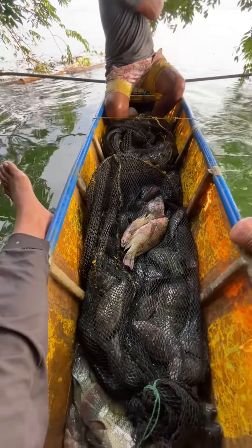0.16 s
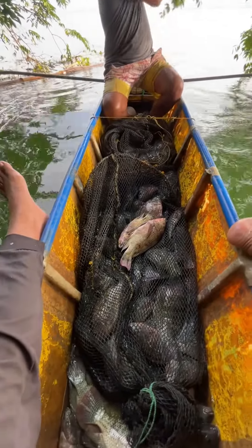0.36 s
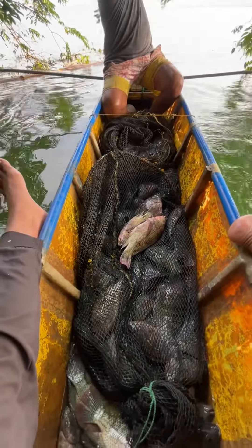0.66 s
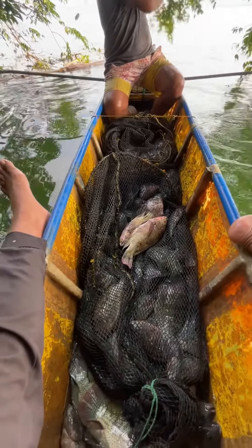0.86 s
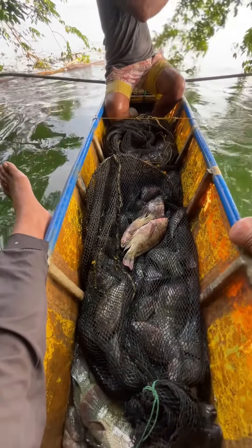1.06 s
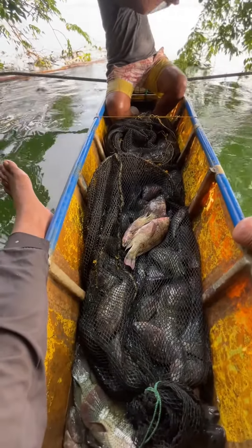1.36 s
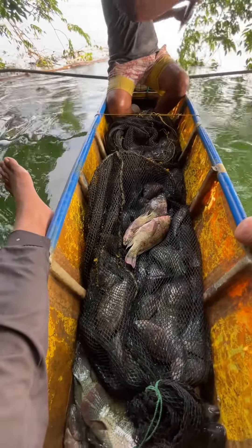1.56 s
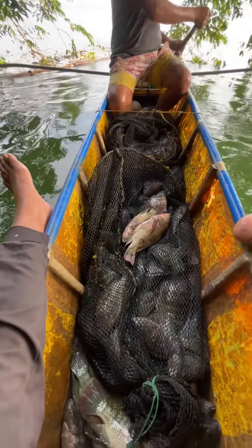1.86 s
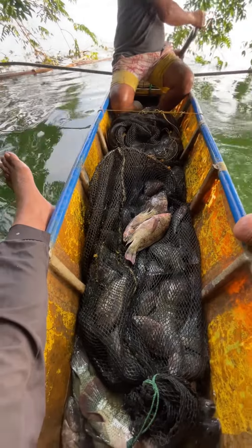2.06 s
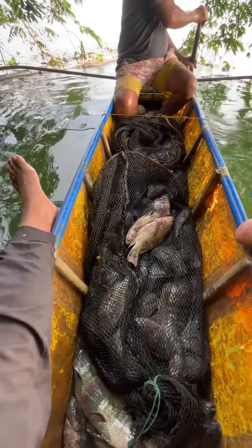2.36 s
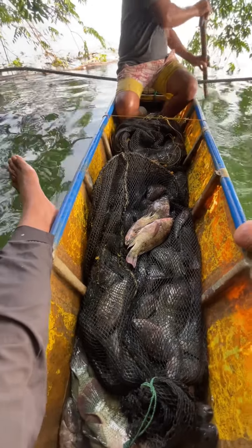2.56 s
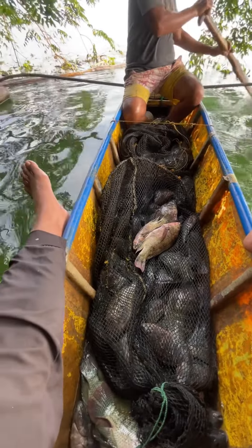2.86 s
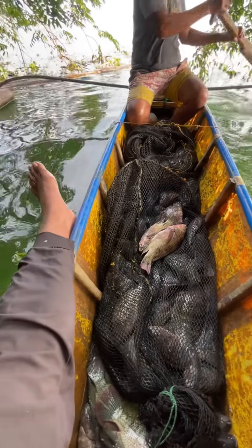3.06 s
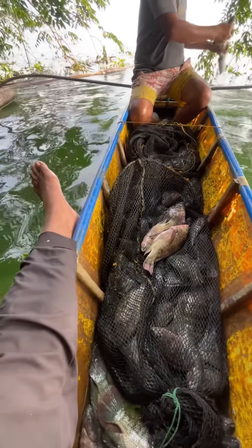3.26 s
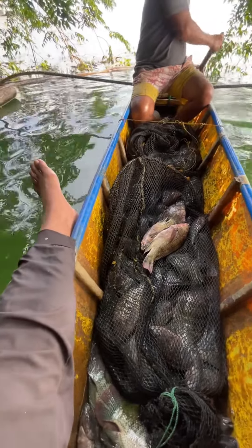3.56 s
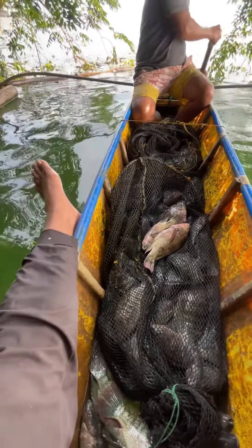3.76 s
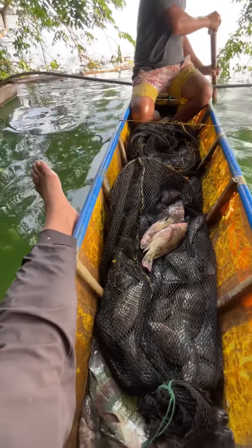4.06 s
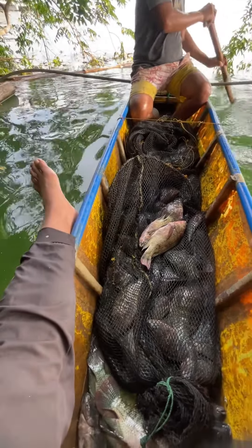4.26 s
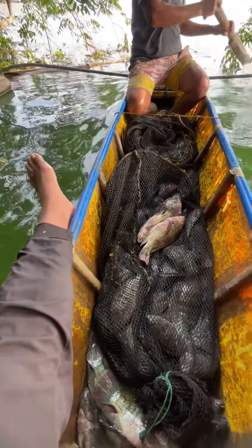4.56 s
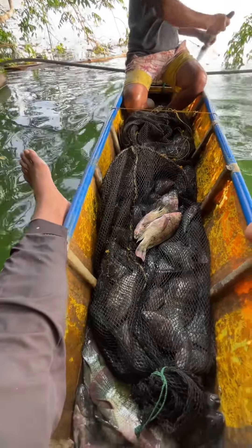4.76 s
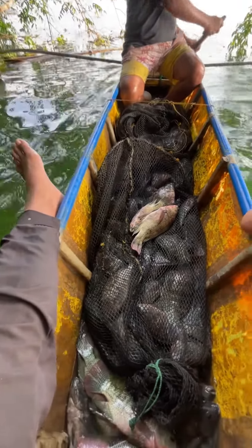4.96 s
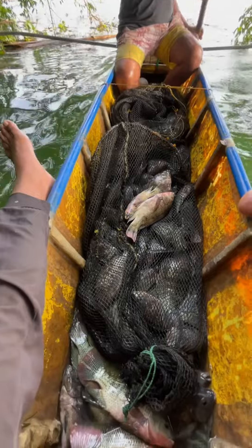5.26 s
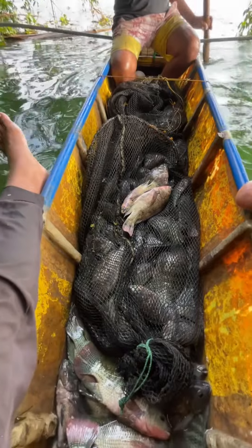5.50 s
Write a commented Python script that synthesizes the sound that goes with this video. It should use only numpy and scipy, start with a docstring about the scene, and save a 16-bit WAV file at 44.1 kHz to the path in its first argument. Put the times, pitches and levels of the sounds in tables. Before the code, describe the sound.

A distant boat engine hums steadily on a wooded river while small birds twitter and chirp. Heard close up from a wooden canoe, paddle strokes wash along the side with hollow plops and trickles. A short splash and dull knocks on the hull come first, then more gurgling. Later a nearer bird sings two whistled trills, and a loud wooden thump follows just before the end.

```python
"""Canoe on a wooded river

A wooden canoe, close to a stereo microphone: the paddle knocks the hull and smacks up spray, trapped
air plops and drips, and each stroke washes along the side. A far boat engine hums. Back in the trees
small birds chirp falling notes over a twittering flock, and a nearer bird whistles hooks and trills."""
import sys
import numpy as np
from scipy import signal
from scipy.fft import rfft, irfft, next_fast_len
from scipy.io import wavfile
from scipy.ndimage import uniform_filter1d, map_coordinates

SR = 44100
rng = np.random.default_rng(int(sys.argv[2]) if len(sys.argv) > 2 else 0)


def unload_audio(sound):
    """Save the sound as a 16-bit wav file, at the path given as the first command line argument."""
    columns = np.transpose(np.atleast_2d(sound))
    # keep every value between -1 and 1, then stretch to whole-number steps
    steps = np.round(np.clip(columns, -1, 1) * 32767)
    wavfile.write(sys.argv[1], SR, steps.astype(np.int16))


N = 248275


def water():
    """Each stroke sloshes under the hull, laps at its side, trickles off the blade and fizzes."""
    # the strokes: (time [s], slosh [dB], lapping [dB], trickle [dB])
    wash = [(0.0, -38, -47.5, -41), (0.16, -47.5, -49, -48), (0.3, -41.5, -48.5, -46.5),
            (0.45, -60.5, -57, -52), (0.9, -63, -58, -53.5), (1.08, -56, -52, -46),
            (1.35, -60.5, -61, -58.5), (1.86, -62, -65, -60), (2.02, -57, -51.5, -50),
            (2.25, -59, -56.5, -62), (2.5, -50.5, -50, -48), (2.76, -44, -50, -53),
            (3.06, -45.5, -44.5, -44), (3.28, -60, -53.5, -50.5), (3.54, -53, -48.5, -54.5),
            (3.67, -50, -44.5, -39), (3.78, -56, -59, -53.5), (4.12, -50.5, -48, -49),
            (4.25, -51.5, -52.5, -52.5), (4.5, -52.5, -45.5, -47.5), (4.75, -62, -57, -53),
            (5.05, -59, -59, -59.5), (5.32, -52, -47.5, -49), (5.52, -48, -47.5, -62),
            (5.63, -60, -60, -55)]
    # even treble hiss: (time [s], level [dB])
    hiss = [(0, -55), (1.2, -62), (1.5, -63), (2.7, -74), (3.1, -59), (3.4, -69), (5.63, -75)]
    # spectra of the four water sounds: (frequency [Hz], relative density [dB])
    slosh = [(90, -37), (180, 2.5), (280, 7), (430, -16), (600, 3), (1000, -64)]
    lapping = [(300, -27), (520, 0.5), (700, 6), (1000, -2.5), (1600, -6), (2500, -40)]
    trickle = [(900, -23), (1700, -2), (3100, 0), (4500, -2.5), (7000, -8), (9000, -23)]
    fizz = [(5500, -45.5), (7500, 7.5), (9500, -2), (11500, -1.5), (13700, -2.5), (15300, -15),
            (16000, -21)]
    slosh_db, lap_db, trickle_db = curves(wash)
    lumps, drops = wobble(rate=30), wobble(rate=30)
    fizz_gain = np.hypot(amp(trickle_db - 8.5 + drops), amp(curves(hiss)[0]))
    return (amp(slosh_db + 1.5 * lumps) * rush(slosh, patchy_db=7.5)
            + bubbles(slosh_db - 0.6, pitch_hz=328, spread=0.269, cycles=3.1, count=500, samples=1500)
            + amp(lap_db + 1.35 * lumps + 3.7 * wobble(rate=40)) * rush(lapping, patchy_db=3)
            + bubbles(lap_db - 13.5, pitch_hz=793, spread=0.464, cycles=6.1, count=1200, samples=1100)
            + amp(trickle_db + drops) * rush(trickle, patchy_db=4.5)
            + bubbles(trickle_db - 6.5, pitch_hz=2796, spread=0.464, cycles=2.4, count=2500, samples=500)
            + fizz_gain * rush(fizz, patchy_db=4.5))


def bubbles(level_db, pitch_hz, spread, cycles, count, samples):
    """Small bubbles ring a few rising cycles each, at random times, scattered left and right."""
    when, pitch, loud = rng.random(count), rng.standard_normal(count), rng.standard_normal(count)
    side = 2 * rng.random(count) - 1
    t = np.arange(samples) / SR
    hz = pitch_hz * np.exp(spread * np.clip(pitch, -2, 1.6))[:, None]
    fade = np.exp(-hz * t / cycles) * amp(3.4 * np.clip(loud, -2, 2))[:, None]
    rings = fade * np.sin(2 * np.pi * hz * t * (1 + 0.0186 * hz * t))
    at = ((when * N).astype(int)[:, None] + np.arange(samples)).ravel()
    pair = [np.bincount(at, (rings * amp(2.1 * ear * side)[:, None]).ravel())[:N] for ear in (1, -1)]
    return amp(level_db) * unit(np.array(pair))


def plops():
    """Trapped air rings amid a gurgle, rising in pitch as it nears the surface, which snaps shut."""
    # plops and drips: (time [s], level [dB], nominal pitch [Hz], left over right [dB], t60 [s])
    drips = [(0.051, -24.5, 336, 0, 0.14), (0.212, -27, 300, -1, 0.15), (0.413, -33.5, 1400, 4, 0.043),
             (0.559, -43, 785, 7, 0.04), (0.838, -43, 670, 9, .045), (0.871, -43, 620, 13, .055),
             (0.94, -27, 491, 6.5, 0.084), (0.955, -36, 1190, 7, 0.15), (0.958, -33, 403, .1, .1),
             (1.266, -39.5, 643, 8, .043), (1.562, -42.5, 1405, 4, .07), (1.875, -42.5, 800, 15, 0.043),
             (2.013, -25, 1012, -6, 0.053), (2.041, -40, 1307, 2.1, .14), (2.118, -34.5, 297, 1.5, 0.076),
             (2.211, -35, 317, 1.1, .09), (2.298, -44, 1215, -3, .06), (2.449, -31, 406, 2.1, .11),
             (2.523, -30.5, 358, .1, 0.077), (2.576, -20.5, 390.9, 2.1, 0.07),
             (2.612, -22.5, 351, 0.5, 0.088), (2.81, -33, 324, -2.1, 0.055), (2.955, -33, 373, .1, 0.07),
             (2.988, -26, 360, .1, 0.077), (3.04, -34, 320, -1, 0.15), (3.1, -36, 1120, -2.1, 0.098),
             (3.243, -35.5, 378, 4, 0.072), (3.392, -42.5, 1740, .1, 0.089), (3.481, -20.5, 753, 9, 0.032),
             (3.571, -33, 770, -0.73, .11), (3.889, -41, 1180, 3, 0.066), (3.967, -32, 632, -0.4, .09),
             (3.998, -31.5, 598, 2, 0.28), (4.042, -20.5, 617, 2.5, 0.088), (4.115, -32, 294, 0, 0.26),
             (4.417, -33.5, 297, -1, 0.12), (4.739, -37.5, 1065, 2.1, 0.053), (5.271, -27, 310, 2, 0.057),
             (5.449, -40, 620, 0, .12), (5.589, -36.5, 600, 6, .075)]
    out, t = np.zeros((2, N)), np.arange(SR // 6) / SR
    for s, db, hz, pan_db, t60 in drips:
        fade = amp(-60 * t / t60) * (1 - np.exp(-t * hz / 1.2))
        tone = np.sin(2 * np.pi * hz * (0.964 * t + 0.073 * t * t / t60))
        bands = lambda f: np.exp(-np.log((f + 1) / [[hz], [2 * hz]]) ** 2 / [[0.31], [0.9]])
        gurgle, snap = filtered(rng.standard_normal(len(t)), bands)
        click = 0.14 * amp(-60 * t / 0.0054) * unit(snap)
        add(out, s - .001, amp(db) * (fade * (tone + 0.44 * unit(gurgle)) + click), pan_db)
    return out


def smacks():
    """A burst of spray swells and quickly dies; at its height the hollow beneath it sounds."""
    # sharp splashes: (time [s], spray [dB], body over spray [dB], time scale [s])
    splashes = [(.004, -20, .1, 0.0059), (0.946, -35, -6, 0.028), (0.971, -41.5, 1.5, 0.021),
                (1.219, -39.5, -27, 0.01), (1.66, -15.5, -0.4, 0.011), (1.697, -33, -16, 0.063),
                (1.746, -21.5, -8, 0.0073), (2.015, -41.5, 4, 0.048), (2.881, -39.5, -30, 0.012),
                (3.039, -34, -14, 0.0056), (3.163, -36, -12, 0.0061), (3.53, -39.5, -9.5, 0.037),
                (3.656, -24.5, -22.5, 0.0059), (3.67, -27.5, -26, 0.002), (4.938, -40.5, 4.5, 0.037)]
    # spray: (frequency [Hz], relative density [dB])
    spectrum = [(1470, -1), (2500, 4.5), (3040, 1.5), (3310, 2), (8080, -2), (14700, -21.5), (16000, -52)]
    # resonances of the hollow: (centre [Hz], width [Hz], relative level [dB])
    cavity = [(269, 38, -1.5), (477, 84, -4.5), (1152, 69, -5), (1725, 220, -12), (2580, 1500, -18.5)]
    out, t = np.zeros((2, N)), np.arange(SR // 5) / SR - .04
    hollow = lambda f: sum((-1) ** k * amp(db) * 1j * f * width / (hz * hz - f * f + 1j * f * width)
                           for k, (hz, width, db) in enumerate(cavity))
    for s, db, body_db, spread in splashes:
        swell = lambda rise, fall: np.exp(-np.abs(t - .003) / (spread * np.where(t < .003, rise, fall)))
        top, side, low = rng.standard_normal((3, len(t)))
        spray = filtered(np.array([top + 0.32 * side, top - 1.24 * side]),
                         lambda hz: amp(along(spectrum, hz)))
        body = filtered(np.array([low + 0.17 * side, low - 0.13 * side]), hollow)
        splash = swell(0.43, 0.68) * unit(spray) + amp(body_db) * swell(0.34, 0.87) * unit(body)
        add(out, s + t[0], amp(db) * splash, pan_db=2.5)
    return out


def hull():
    """Soft blows ring the planks, first pulling away from the microphone; longer contact is duller."""
    # paddle on wood: (time [s], level [dB], contact [s], damping [factor])
    blows = [(1.6619, -24.5, 0.0028, 1.2), (1.976, -17, 0.0038, 1.97), (2.227, -28, 0.0023, 3.9),
             (2.792, -33, 0.0016, 2.7), (4.929, -30, 0.0022, 1.1), (4.9429, -18.5, 0.00059, 2.2),
             (4.949, -4, 0.0022, 0.9)]
    # plank modes: (frequency [Hz], relative level [dB], t60 at damping 1 [s])
    modes = [(78.4, -21.5, 0.23), (113.5, -4.5, 0.27), (144, 10.5, 0.035), (159, -9.5, 0.25),
             (192.8, -4, 0.18), (267.3, -1, 0.158), (309, -11.5, 0.15), (366, -7, 0.11), (476, -6, 0.086),
             (640, -18, 0.084)]
    out, t = np.zeros((2, N)), np.arange(SR // 2) / SR
    for s, db, contact, damping in blows:
        ring = sum(amp(level - 60 * damping * t / t60) * np.sin(2 * np.pi * hz * t)
                   / (1 + (hz * contact) ** 2) for hz, level, t60 in modes)
        add(out, s, -amp(db) * ring * (1 - np.exp(-t / contact)))
    return out


def singer():
    """The nearer bird, a little to the right: a pure whistle whose trill syllables sweep up and break."""
    syllables_per_s, uneven_syllables = 28, 0.147
    out, flutter, wander = np.zeros((2, N)), wobble(rate=90), wobble(rate=15)
    for rows in song():
        s, *cols = np.transpose(rows)
        t = np.arange(s[0], s[-1], 1 / SR)
        at = (t * SR).astype(int)
        hz, db, depth = [np.interp(t, s, c) for c in cols]
        beat = ((t - s[0]) * syllables_per_s + uneven_syllables * wander[at]) % 1
        gate = 1 - np.clip(depth / 100, 0, .85) * (1 - np.abs(np.sin(np.pi * beat ** .8)) ** .7)
        sweep = 2 * np.sin(np.pi * beat * .55) - 1.3
        note = np.sqrt(2) * amp(db) * gate * np.sin(2 * np.pi * np.cumsum(hz + depth * sweep) / SR)
        add(out, s[0], note * amp(1.1 * flutter[at]), pan_db=-1.5)
        add(out, s[0] + 0.003, amp(-2) * echo(note))
    return out


def song():
    """The singer's notes, each as rows of (time [s], pitch [Hz], level [dB], trill depth [Hz])."""
    # a hook's dip and leap: (time from its start [s], pitch [Hz], relative level [dB])
    hook = [(0, 2870, -13), (.006, 2700, -5.5), (.021, 1790, -11), (0.029, 2770, 2.1), (0.039, 3190, -1),
            (.058, 3050, -12), (.076, 3080, -33)]
    # hooks sung: (time [s], level [dB])
    hooks = [(3.825, -32.5), (4.626, -32.5)]
    # trills: (time [s], length [s], first pitch [Hz], last pitch [Hz], level [dB])
    trills = [(3.982, 0.22, 2900, 2754, -32.5), (4.76, .238, 2840, 2802, -31)]
    # the drop closing a trill: (time after it [s], pitch [Hz], relative level [dB])
    drop = [(0.014, 2550, -2), (.032, 2354, -10), (.045, 1970, -18.5)]
    # the last, sliding note: (time [s], pitch [Hz], level [dB])
    slide = [(5.412, 3630, -45.5), (5.419, 3536, -26.5), (5.426, 3480, -31.5), (5.432, 3080, -32.5),
             (5.456, 2602, -37), (5.511, 2450, -34), (5.529, 1965, -40.5), (5.54, 1690, -62)]
    depth_hz, attack_s, rise_db = 171, 0.011, 28
    notes = [[(s + dt, hz, db + d, 0) for dt, hz, d in hook] for s, db in hooks]
    for s, length, first, last, db in trills:
        trill = [(s, first, db - rise_db, depth_hz), (s + attack_s, first, db, depth_hz),
                 (s + length, last, db, depth_hz)]
        notes.append(trill + [(s + length + dt, hz, db + d, 0) for dt, hz, d in drop])
    return notes + [[(*row, 0) for row in slide]]


def chirps():
    """Thin husky whistles drop fast to a knee and then slide on, mostly heard through the trees."""
    # (time [s], top pitch [Hz], end pitch [Hz], time to knee [s], length [s], level [dB], echo [dB])
    calls = [(0.072, 6900, 4482, 0.035, .1, -46, -8), (0.439, 6650, 4750, 0.036, 0.12, -42.5, 0),
             (0.692, 7270, 3980, 0.052, 0.12, -55, 14), (0.956, 6980, 4670, .05, 0.16, -48, -4),
             (1.074, 6410, 5200, 0.063, 0.074, -46.5, -5), (1.295, 7040, 4300, 0.062, .12, -54, 13.5),
             (1.768, 6860, 4500, 0.061, 0.11, -41, -2.5), (1.969, 6180, 4570, 0.024, 0.077, -49.5, 2.5),
             (2.161, 7170, 4050, .05, .14, -52, 7), (2.367, 7450, 4730, 0.034, 0.14, -51, 2),
             (2.686, 7240, 4790, .028, 0.14, -45, 1), (3.733, 7100, 4600, .027, 0.13, -42, -3.5),
             (3.989, 7370, 4540, 0.068, 0.13, -53.5, 11.5), (4.098, 4770, 4710, 0.0036, 0.032, -43, -7),
             (4.261, 7060, 4380, 0.051, 0.11, -49, 4.5), (4.569, 7140, 4355, 0.044, 0.14, -51.5, 8.5),
             (5.101, 7130, 4640, 0.041, 0.11, -34, -2.5), (5.45, 7230, 4280, .068, 0.14, -49.5, 9.5)]
    # contour at start, end of hold, knee, end of slide and end: (relative level [dB])
    contour = [-4.5, 4, 0, -1.5, -9.5]
    knee_hz, husk_hz, husk_db, blur_hz_per_db = 5450, 45, 3.5, 30
    out, flutter, waver = np.zeros((2, N)), wobble(rate=140), wobble(rate=340)
    for s, top_hz, end_hz, knee, length, db, echo_db in calls:
        t, at = np.arange(round(length * SR)) / SR, round(s * SR)
        marks = [0, .45 * knee, knee, .85 * length, length]
        pitches = [top_hz, .97 * top_hz, min(knee_hz, top_hz), min(1.085 * end_hz, top_hz), end_hz]
        blur = (husk_hz + blur_hz_per_db * max(echo_db, 0)) * waver[at:][:len(t)]
        hz = np.interp(t, marks, pitches) + blur
        note = amp(db + np.interp(t, marks, contour)) * np.sin(2 * np.pi * np.cumsum(hz) / SR)
        # the deeper a bird sits in the leaves, the less of it arrives directly
        add(out, s, note * amp(husk_db * flutter[at:][:len(t)] - .6 * np.clip(echo_db, 0, 20)))
        add(out, s + 0.002, amp(echo_db) * echo(note))
    return out


def echo(note):
    """The trees answer a note: near branches at once, then a tail, each frequency at its own speed."""
    # decay among the trees: (frequency [Hz], t60 [s])
    trees = [(1500, 0.7), (3000, 0.36), (7000, 0.58)]
    hz, t, noise = signal.stft(rng.standard_normal((2, SR // 2)), SR, nperseg=256)
    fading = amp(-60 * t / along(trees, hz)[:, None]) + 1.33 * amp(-60 * t / 0.052)
    tail = signal.istft(noise * fading, SR, nperseg=256)[1]
    energy = SR * trees[1][1] / (2 * np.log(1000))
    return signal.fftconvolve(note[None], tail / np.sqrt(energy), axes=1)


def engine():
    """Low orders of a far boat engine, each wavering in the air; the weak ones waver most."""
    # engine orders: (multiple of the firing rate, rms level [dB])
    orders = [(2, -51), (3, -37), (4, -62), (5, -57.5), (6, -58.5), (7, -56.5), (8, -62.5), (9, -54)]
    firing_hz = 27.57
    dip_s, half_width_s, dip_db = 5.12, 0.012, -24  # the hum drops out briefly after the heavy blow
    turns = np.cumsum(firing_hz * (1 + 0.0024 * wobble(rate=2.78))) / SR
    waver = lambda db: np.interp(db, [-55, -38], [3.5, 1.2]) * wobble(rate=9)
    dip = amp(dip_db * np.exp(-((np.arange(N) / SR - dip_s) / half_width_s) ** 4))
    return dip * sum(np.sqrt(2) * amp(db + waver(db)) * np.sin(2 * np.pi * (k * turns + rng.random()))
                     for k, db in orders)


def flock():
    """Many far birds twitter, blurred into a band of noise."""
    # swells of the flock: (time [s], level [dB])
    twitter = [(0, -39), (.2, -41), (.5, -47.5), (1.05, -41), (1.46, -51.5), (1.9, -45.5), (2.2, -51.5),
               (2.75, -61.5), (3.05, -43), (3.17, -42), (3.31, -63.5), (3.65, -43.5), (3.78, -50.5),
               (4.1, -46), (4.6, -57), (5.63, -53)]
    # its band: (frequency [Hz], relative density [dB])
    spectrum = [(3300, -29), (4200, -9), (5200, 1), (6800, -2.5), (7400, -10.5), (8200, -46.5)]
    return amp(curves(twitter)[0] + 0.41 * wobble(rate=12)) * rush(spectrum, patchy_db=5)


def air():
    """The low, steady bed of river and trees."""
    # (frequency [Hz], relative density [dB])
    spectrum = [(15, -49), (30, -27), (53, 3.5), (84, -12), (108, 3), (134, -12), (249, -10), (330, -33),
                (700, -36), (3700, -42), (7100, -63), (16000, -55)]
    return amp(-48.5) * rush(spectrum, patchy_db=4.5)


def rush(spectrum, patchy_db):
    """Stereo noise of rms 1 with patches of random gain in time and frequency."""
    # likeness of left and right at the microphone: (frequency [Hz], correlation)
    alike = [(150, 1), (300, 0.88), (600, 0.067), (1200, 0.64), (2500, 0.35), (6000, 0.23), (9000, 0.93),
             (16000, 0.11)]
    noise = signal.stft(rng.standard_normal((2, N)), nperseg=512)[2]
    patches = uniform_filter1d(rng.standard_normal(noise.shape[1:]), size=5, axis=0)
    patches = uniform_filter1d(patches, size=5, axis=1)
    pair = signal.istft(noise * amp(patchy_db * unit(patches)), nperseg=512)[1][:, :N]
    turn = lambda hz: np.arccos(np.clip(along(alike, hz), -1, 1)) / 2
    mid, side = filtered(pair, lambda hz: amp(along(spectrum, hz)) * [np.cos(turn(hz)), np.sin(turn(hz))])
    return unit(np.array([mid + side, mid - side]))


def amp(db):
    return 10 ** (np.asarray(db) / 20)


def unit(x):
    return x / np.sqrt(np.mean(x ** 2) + 1e-20)


def along(points, hz):
    """Interpolates (frequency [Hz], value) points on a log axis."""
    f, v = np.transpose(points)
    return np.interp(np.log(hz + 1), np.log(f + 1), v)


def curves(rows):
    """One value per sample for each column after the time."""
    s, *cols = np.transpose(rows)
    return [np.interp(np.arange(N) / SR, s, c) for c in cols]


def wobble(rate):
    """A smooth random curve, rate knots a second."""
    return map_coordinates(rng.standard_normal(2000), [np.arange(N) * rate / SR])


def filtered(x, response):
    """Filters x by a complex response of frequency."""
    n = x.shape[-1]
    m = next_fast_len(n + 4096)
    return irfft(rfft(x, m) * response(np.fft.rfftfreq(m, 1 / SR)), m)[..., :n]


def add(out, s, x, pan_db=0):
    """Mixes a sound into out at time s; positive pan is left."""
    at = round(s * SR)
    x = x[..., max(-at, 0):]
    part = out[:, max(at, 0):][:, :x.shape[-1]]
    part += (x * amp([[pan_db / 2], [-pan_db / 2]]))[:, :part.shape[1]]


def scene():
    """The river as heard from the canoe."""
    return engine() + water() + air() + plops() + smacks() + hull() + flock() + chirps() + singer()


def record(dry):
    """The microphone's right port hears slightly later, less so in the treble; both band ends are cut."""
    low_hz, top_hz = 57, 15800
    lag = lambda hz: .000055 * np.array([[-.5], [.5]]) / (1 + hz / 8000)
    low_cut = lambda hz: -hz ** 2 / (low_hz ** 2 - hz ** 2 + np.sqrt(2) * 1j * hz * low_hz)
    return filtered(dry, lambda hz: low_cut(hz) * np.exp(-2j * np.pi * hz * lag(hz)) * (hz < top_hz))


dry = scene()
out = record(dry)
unload_audio(out)
```